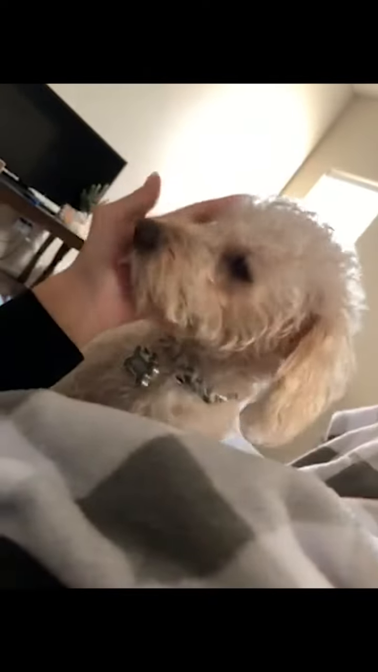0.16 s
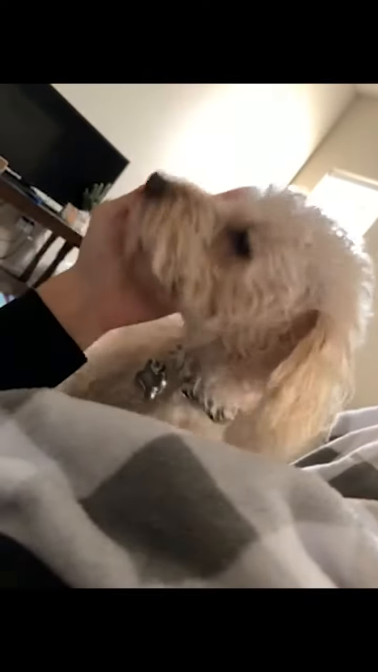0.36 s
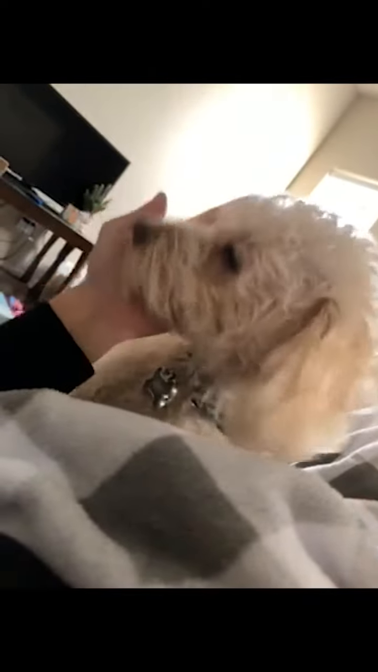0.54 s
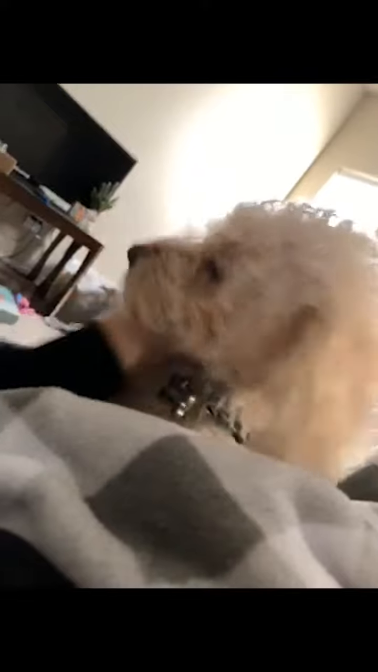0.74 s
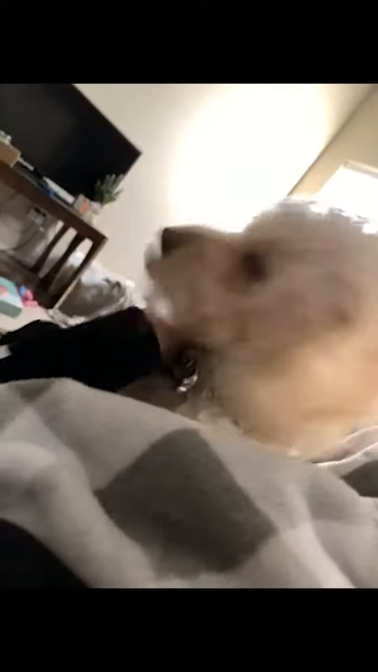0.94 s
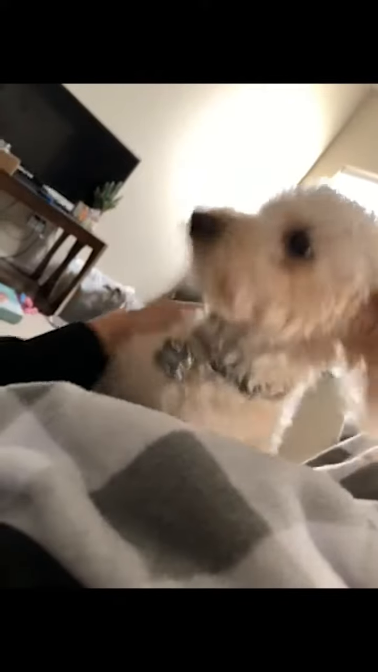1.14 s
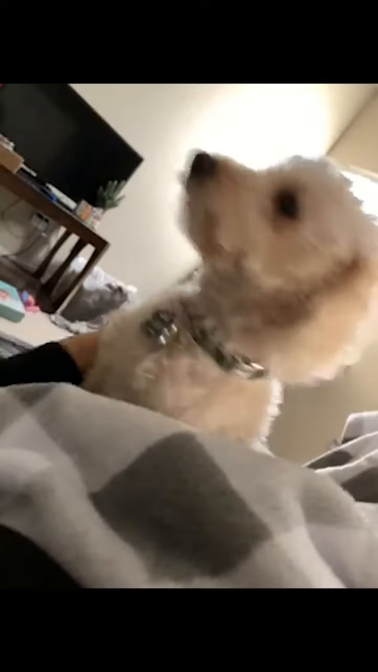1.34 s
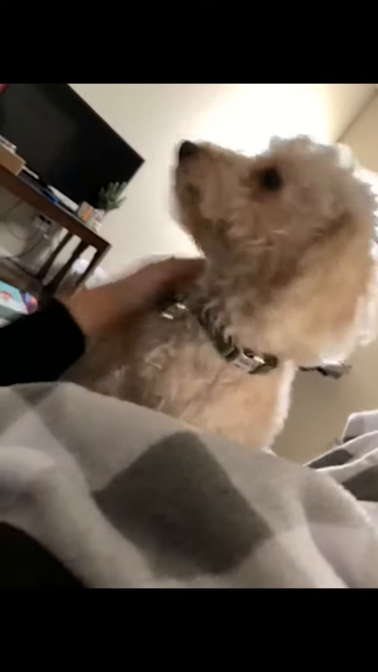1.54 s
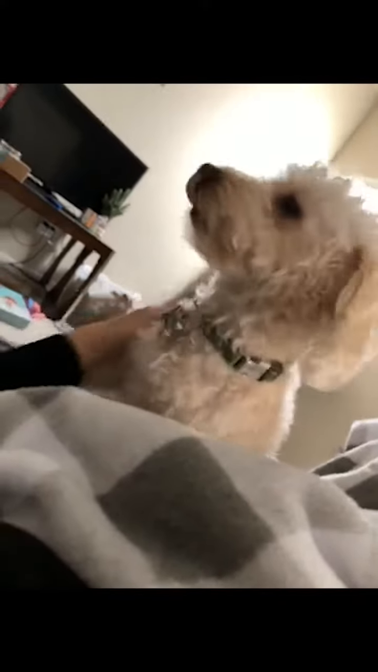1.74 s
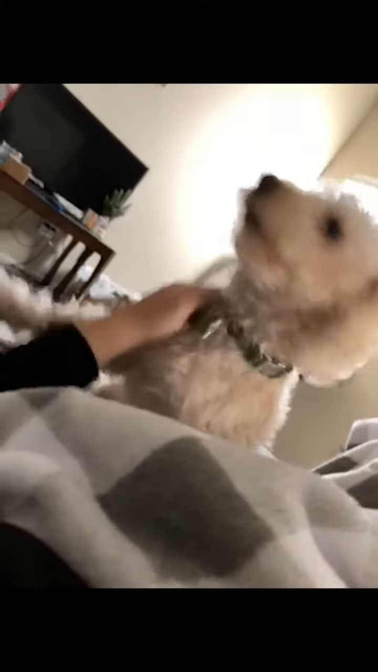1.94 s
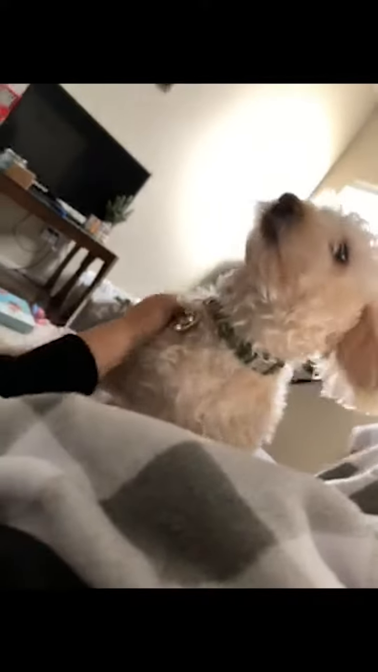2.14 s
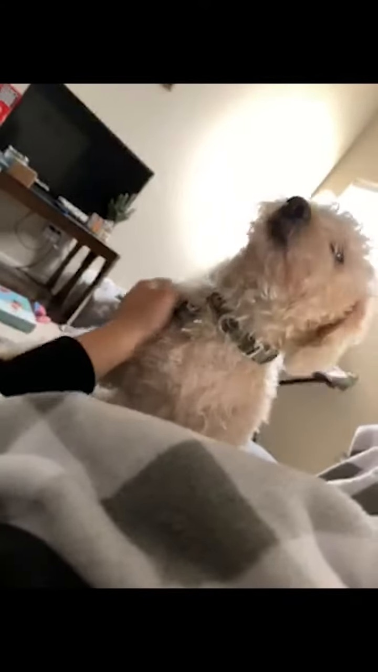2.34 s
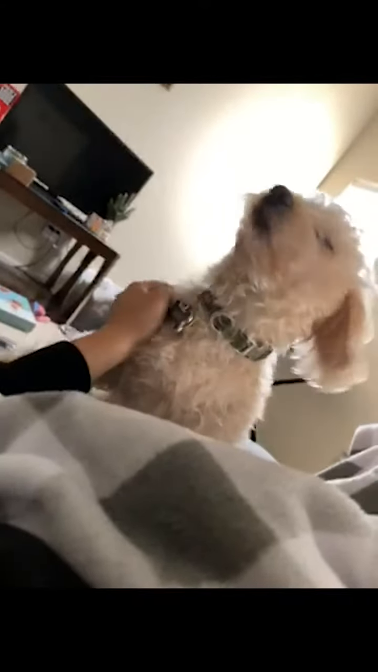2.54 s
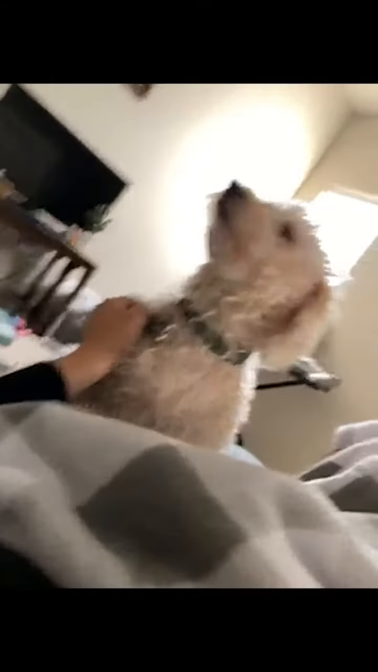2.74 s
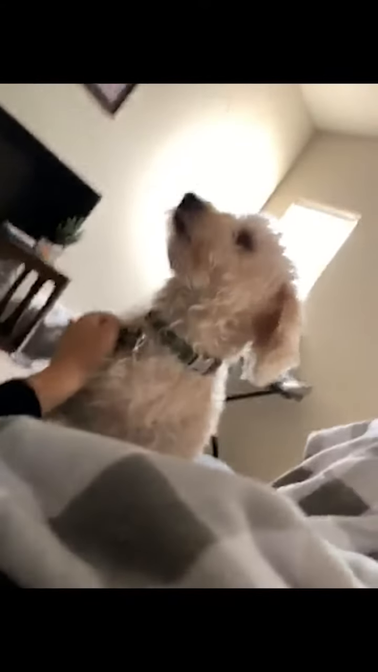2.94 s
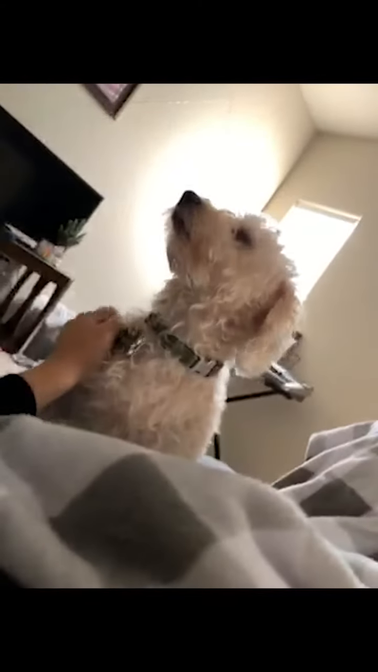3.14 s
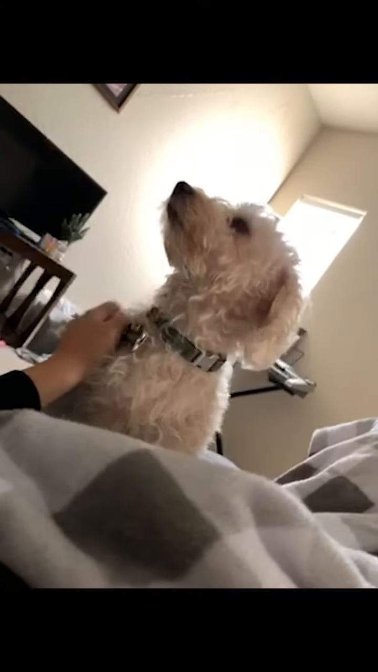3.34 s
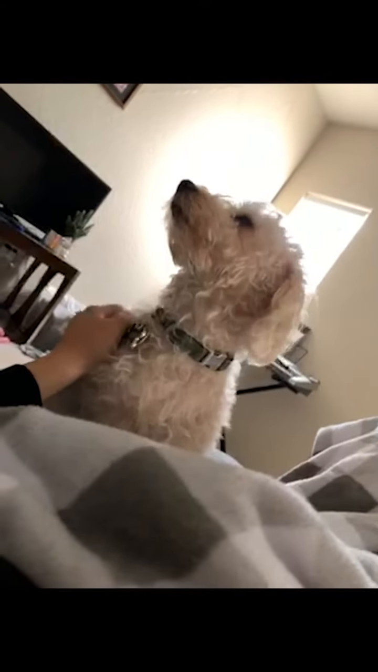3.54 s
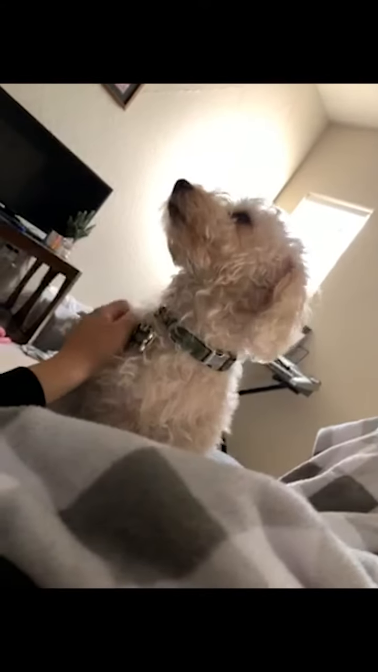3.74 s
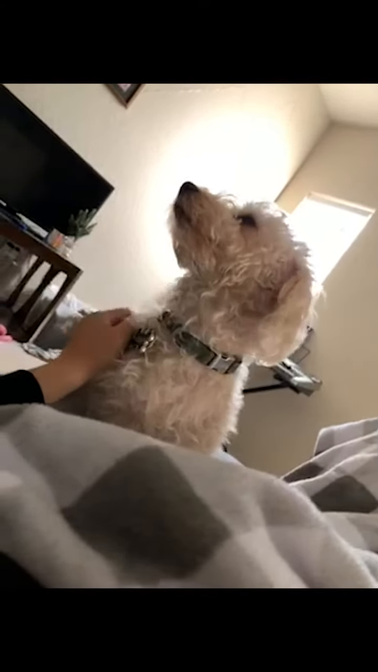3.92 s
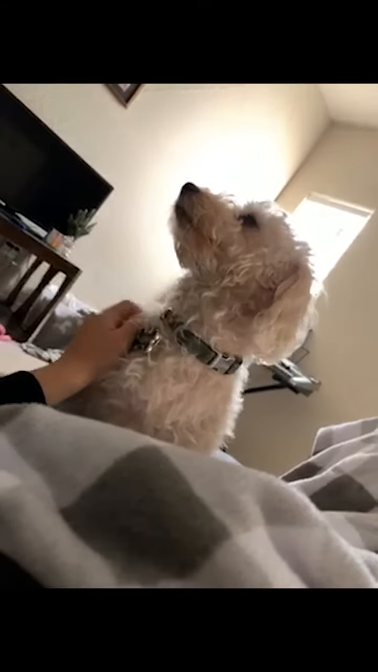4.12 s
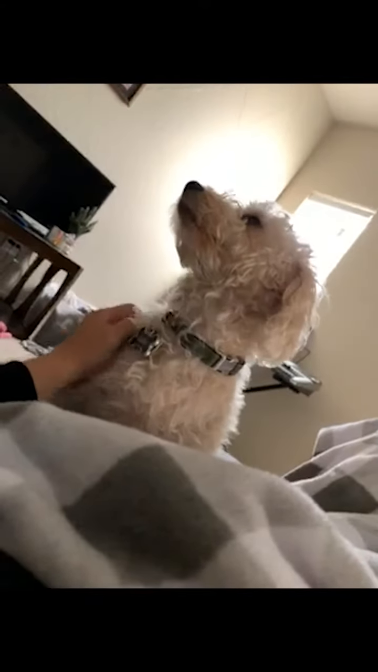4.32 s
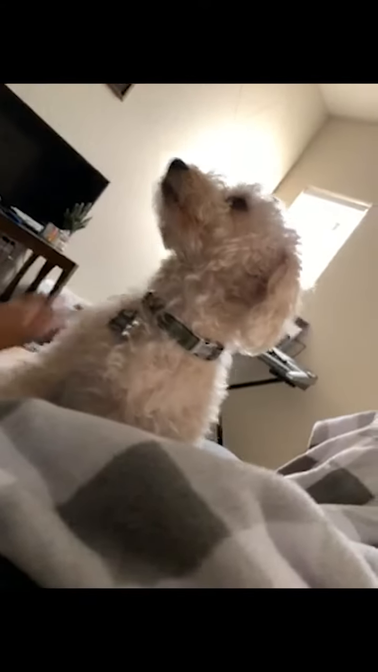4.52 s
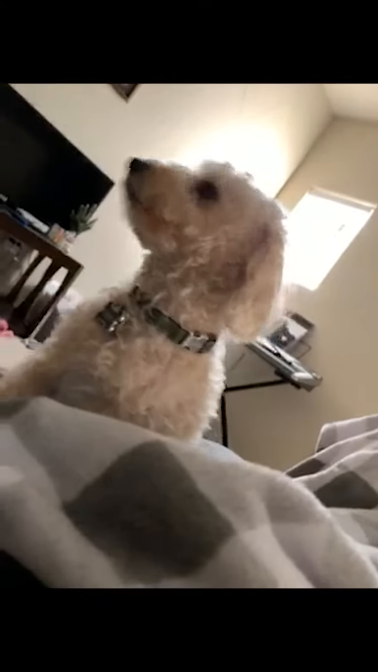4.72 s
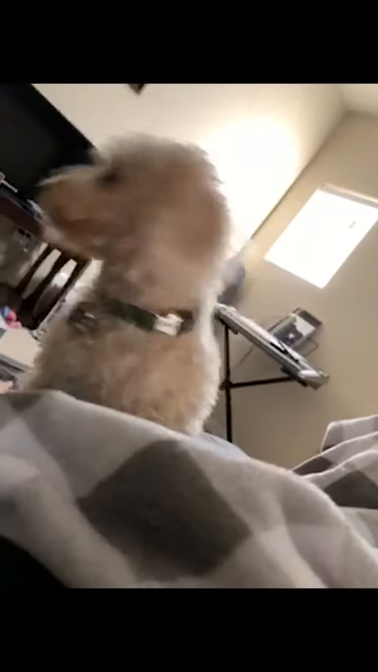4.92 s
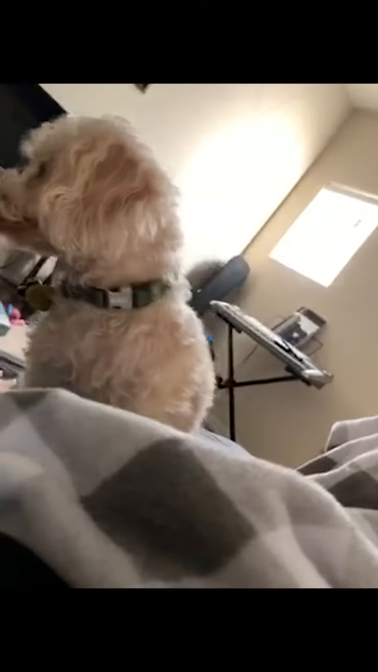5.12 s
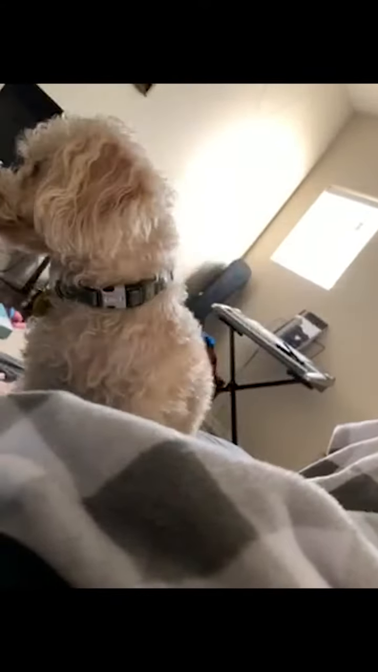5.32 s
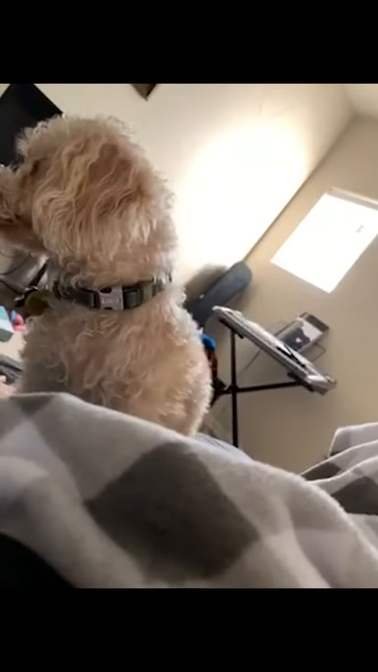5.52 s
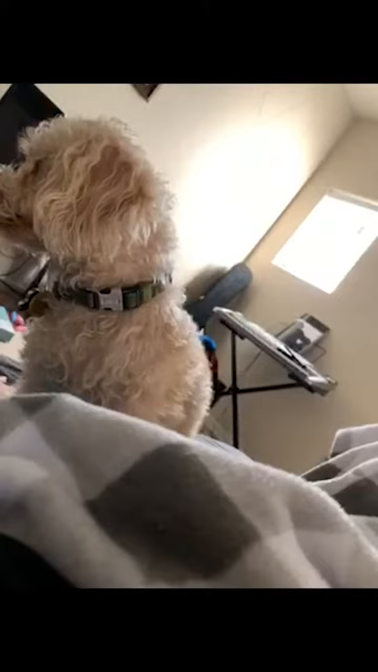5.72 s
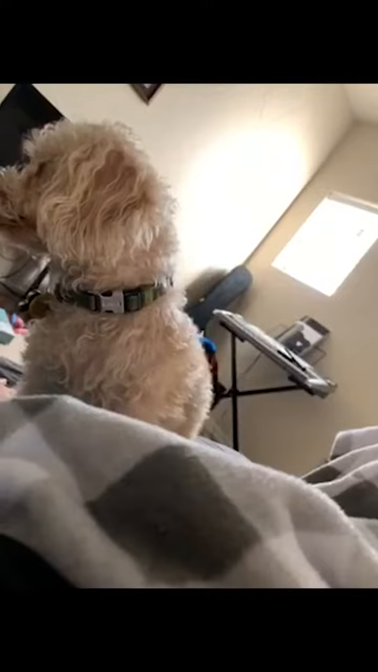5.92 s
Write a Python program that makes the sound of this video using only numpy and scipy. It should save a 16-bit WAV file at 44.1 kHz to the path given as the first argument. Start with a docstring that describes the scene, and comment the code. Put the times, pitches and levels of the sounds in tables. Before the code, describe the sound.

Close, dry jingling of collar tags and grainy fur scratching on a creaky bed, with a single dull thump near the end.

```python
"""On a bed, close to a hand-held camera: fingers scratch a small dog's curly neck, as swelling bands of grainy noise.
The collar tags, damped by fur, clack without ringing on: short noisy contacts excite heavily damped resonances.
The bed frame creaks in low slips, knocks falling in pitch; the mattress rumbles and the bedding rustles as shaped
noise. One heavy thump is a set of late, decaying modes over a slap. Cloth scuffs and a steady hiss lie around them."""
import sys
import numpy as np
from scipy import signal
from scipy.fft import rfft, irfft
from scipy.io import wavfile
from scipy.ndimage import uniform_filter1d

SR = 44100
rng = np.random.default_rng(int(sys.argv[2]) if len(sys.argv) > 2 else 0)


def gain_from_decibels(decibels):
    """Convert decibel values to linear amplitude factors."""
    exponent = np.asarray(decibels, float) / 20
    return 10 ** exponent


def wav_record(signal):
    """Record a signal, one row per channel, as 16-bit PCM in the file named by sys.argv[1]."""
    frames = np.transpose(np.atleast_2d(signal))
    bounded = np.clip(frames, -1, 1)
    # unit amplitude maps onto the largest positive 16-bit level
    quanta = np.round(bounded * 32767).astype(np.int16)
    wavfile.write(sys.argv[1], SR, quanta)


N = 263316

# slips of the bed frame, each of which also drags the bedding: (time [s], level [dB], knock pitch [Hz])
SLIPS = [(0.06, -28.5, 341), (0.16, -29.5, 365), (0.404, -22.5, 297), (0.492, -23, 290), (0.511, -26, 250),
         (0.547, -30, 290), (0.559, -21, 322), (0.596, -17, 284), (0.616, -22, 212), (0.634, -27, 250),
         (0.97, -27, 250), (1.101, -24, 345), (1.298, -21, 333), (1.346, -21, 312), (1.403, -18.5, 316),
         (1.465, -23.5, 380), (1.515, -28, 234), (1.523, -26, 340), (1.545, -21, 315), (1.575, -30.5, 360),
         (2.124, -22, 209), (2.145, -24.5, 210), (2.196, -24.5, 334), (2.211, -29, 240), (2.267, -35, 224),
         (2.296, -35, 274), (2.573, -24.5, 316), (2.734, -26, 238), (4.536, -18.5, 335), (4.566, -19, 323),
         (4.589, -21.5, 320), (4.622, -20, 310), (4.654, -22, 350), (5.054, -23.5, 213.5),
         (5.094, -22, 255), (5.115, -16.5, 290), (5.141, -28, 275), (5.16, -26.5, 234), (5.201, -31, 250)]


def evened(x):
    """Scales to rms 1."""
    return x / np.sqrt(np.mean(x ** 2) + 1e-20)


def add(mix, s, sound):
    """Mixes a sound in at a time in seconds."""
    part = mix[round(s * SR):][:len(sound)]
    part += sound[:len(part)]


def resonate(x, hz, width):
    """A fixed or gliding resonance of gain 1: one complex pole, or shift down, smooth and shift back."""
    r = np.exp(-np.pi * max(width, 1) / SR)
    if np.ndim(hz) == 0:
        return 2 * signal.lfilter([1 - r], [1, -r * np.exp(2j * np.pi * hz / SR)], x).real
    turn = np.exp(2j * np.pi * np.cumsum(hz) / SR)
    return 2 * (turn * signal.lfilter([1 - r], [1, -r], x / turn)).real


def through(x, modes):
    """Steep-sided resonances side by side, each two poles deep, with alternating sign."""
    total = 0
    for k, (hz, width, db) in enumerate(modes):
        band = resonate(resonate(x, hz, width), hz, width)
        total = total + (-1) ** k * gain_from_decibels(db) * band
    return total


def level_curve(rows):
    """Table levels in dB joined by straight lines in time."""
    s, db = np.transpose(rows)
    return np.interp(np.arange(N) / SR, s, db)


def lumpy(per_s, depth_db):
    """Noise whose level wanders at about per_s times a second, by depth_db rms."""
    span = int(SR / per_s)
    wander = evened(uniform_filter1d(uniform_filter1d(rng.standard_normal(N), span), span))
    return rng.standard_normal(N) * gain_from_decibels(depth_db * wander)


def snaps(per_s, spread_db, low_hz, high_hz, count):
    """Sparse tiny ticks of random size, each with one of count short rings."""
    happens = rng.random(N) < per_s / SR
    size = gain_from_decibels(spread_db * np.minimum(rng.exponential(1, N), 4)) * happens
    kind, t = rng.integers(0, count, N), np.arange(200) / SR
    ticks = np.zeros(N)
    for k, hz in enumerate(np.geomspace(low_hz, high_hz, count)):
        ring = np.sin(2 * np.pi * hz * t) * np.exp(-t * hz / 3.4)
        ticks += signal.oaconvolve(size * (kind == k), ring)[:N]
    return evened(ticks)


def fur():
    """Hairs slide and snap past the nails: grainy noise in three broad bands, each swelling on its own."""
    # finger strokes through fur: (peak time [s], scratch level [dB], time to swell 20 dB [s],
    # time to fade 20 dB [s], dull swish re scratch [dB], fine hiss re scratch [dB])
    strokes = [(0.031, -42.5, .5, 0.05, 2, -4), (.367, -57, 0.7, .15, -3, 0),
               (.678, -51.5, 0, 0.06, -11, -10), (.854, -55, 0.2, 0.3, -5, -0.5),
               (1.0, -47, 0.07, .25, -3, -8), (1.11, -47, 0.27, 0.33, -7.5, -9),
               (1.35, -50, .9, .11, -6.5, -5), (1.56, -41.5, .12, 0.1047, 1, -8.5),
               (1.724, -30.5, .08, .13, -11.5, -4), (1.82, -44.5, .3, .15, -12, -13),
               (1.966, -40, .15, .11, -5, -9), (2.065, -42.5, 0.12, 0.28, -8, -5),
               (2.167, -46.5, .5, 0.08, -9.5, -5), (2.45, -50, 0.1, .15, -6.5, -4),
               (2.54, -60, 0.7, .2, -9, 4), (2.656, -58, 0.8, 0.4, -8.5, -1),
               (2.774, -53, .15, 0.32, -3.5, -2), (2.87, -57, .3, 0.23, 2, -1.5),
               (3.211, -52.5, .125, 0.3, -6, -4), (3.608, -48, .13, .14, -8, -6),
               (3.911, -53, .04, .3, -7, -2), (3.95, -48.5, .13, .1, -7, -3),
               (4.186, -62, 0.2, 0.4, -6, 2.5), (4.335, -54, .13, .12, -3.5, -1),
               (4.45, -54, .25, .09, -5, -1), (4.63, -61, .15, .15, 3, -2)]
    # resonances of the scratch, the dull swish and the fine hiss: (centre [Hz], pole width [Hz], relative level [dB])
    scratch_modes = [(6110, 2300, 2), (7630, 1900, 0.5)]
    swish_modes = [(1710, 2440, 2), (3670, 2970, 3), (4630, 1230, -4)]
    hiss_modes = [(10270, 3100, 3.5), (12730, 2800, 0.5), (15100, 2390, -0.5)]
    roundness = 1.35  # 1 = pointed stroke peak, 2 = round

    t = np.arange(N) / SR
    coarse_t = t[::44]  # about every millisecond
    s, db, swell_s, fade_s, swish_db, hiss_db = np.transpose(strokes)[:, :, None]
    away = np.maximum((s - coarse_t) / swell_s, (coarse_t - s) / fade_s)
    strokes_db = db - 20 * away ** roundness

    def pressure(rel_db):
        """The strongest stroke of each moment sets the gain."""
        return gain_from_decibels(np.interp(t, coarse_t, (strokes_db + rel_db).max(0)))

    hairs = lumpy(per_s=140, depth_db=1.5)
    scratch = evened(through(hairs, scratch_modes)) + 0.4 * snaps(260, 4., 4800, 8700, count=8)
    swish = evened(through(hairs, swish_modes)) + 0.28 * snaps(200, 3.5, 1800, 4500, count=8)
    # light hairs move little air at low pitch
    swish = signal.sosfilt(signal.butter(3, 1350, "high", fs=SR, output="sos"), swish)
    fine = evened(through(hairs, hiss_modes))
    parts = pressure(0) * scratch, pressure(swish_db) * swish, pressure(hiss_db) * fine

    out = np.zeros(N)
    for part, points in zip(parts, rng.standard_normal((3, 400))):
        swell = evened(np.interp(t, np.arange(len(points)) / 35, points))  # 35 random points a second
        out += gain_from_decibels(1.6 * swell) * part
    return out


def tags():
    """Each clack is a sharp contact with a short chatter, exciting a heavily damped ring."""
    # tag clacks: (time [s], ring level [dB], ring pitch [Hz], dull body re ring [dB], bright edge re ring [dB])
    clacks = [(0.017, -19, 4500, -16, -11), (0.108, -33, 6740, -16, -20), (0.143, -43, 4370, 14.5, -3),
              (0.1872, -34.5, 7000, -20, -1), (0.6571, -48.5, 4470, 12, -11), (0.6597, -38, 7750, -7, -8),
              (0.6771, -23.5, 6900, -32, -2), (0.739, -39, 6500, -17, -3), (0.8637, -30.5, 8060, -19, -9),
              (0.8729, -37, 7840, -12, -3), (1.028, -16, 6830, -13.5, -10), (1.0983, -17, 6560, -16, -28),
              (1.1004, -19, 6340, -8.5, -25), (1.112, -17.5, 6980, -23, -30),
              (1.1154, -14.5, 6600, -16, -32), (1.6493, -33, 8480, -17, 13), (1.6585, 6.5, 7060, -15, -10),
              (1.6803, -25, 7240, -10, -16), (1.7096, 8.5, 6940, -11.5, -6), (1.7111, 2, 7000, -14, -8),
              (1.7137, -5.5, 7160, -26, -30), (1.715, -3.5, 7260, -23, -30), (1.721, -0.5, 6500, -23, -4),
              (1.7247, -12.5, 6240, -3.5, -1), (1.7491, -14.5, 7210, -8.5, -3),
              (1.7862, -20, 6240, -10, -15), (1.802, -1, 6650, -20, -13.5), (1.8085, -22, 6700, -9, -1),
              (1.932, -25, 7200, -14, -16), (1.9469, -21, 6500, -10, -30), (1.9664, -5.5, 6850, -33, -16),
              (1.9674, -9, 6830, -29, -12), (1.971, -24, 7360, -10, 5), (1.9746, -7.5, 6540, -25, -18),
              (2.004, -23, 5300, -19, -11), (2.007, -22, 6960, -16.5, -10), (2.0485, -14, 7600, -10.5, 10),
              (2.0564, -9, 6600, -12.5, -15), (2.0626, -9, 6270, -29, -5.5), (2.082, -24, 6500, -26, 0),
              (2.1084, -8, 6800, -15.5, -33), (2.1416, -14.5, 6760, -18, -9), (2.3542, -27, 6300, -29, -24),
              (2.3811, -25, 5500, -27, -28), (2.8748, -39.5, 6000, 0.5, 6)]
    # body, edge and a neighbouring mode rung by every clack: (centre [Hz], pole width [Hz], relative level [dB])
    body_modes = [(2490, 850, -4.5), (3810, 2080, -3)]
    edge_modes = [(8800, 2640, -4.5), (12530, 1600, -4), (14630, 1400, -1.5)]
    upper_modes = [(7130, 970, -8)]
    chatter_s, chatter_spread_db = 0.0008, 2  # how long a contact rattles, and how much that varies

    out, t = np.zeros(N), np.arange(600) / SR
    chance = rng.standard_normal((len(clacks), len(t) + 1))
    for (s, db, hz, body_db, edge_db), (luck, *noise) in zip(clacks, chance):
        rattle_s = chatter_s * gain_from_decibels(chatter_spread_db * luck)
        contact = 0.73 * np.array(noise) * np.exp(-t / rattle_s)
        contact[:2] += 1.5  # the sharp first touch
        ring = resonate(resonate(contact, hz, 790), hz, 3200) + through(contact, upper_modes)
        parts = ring, through(contact, body_modes), through(contact, edge_modes)
        ring, body, edge = (p / abs(p).max() for p in parts)
        add(out, s - 0.0003, gain_from_decibels(db) * (ring + gain_from_decibels(body_db) * body + gain_from_decibels(edge_db) * edge))
    # small tags move little air below 900 Hz
    return signal.sosfilt(signal.butter(2, 900, "high", fs=SR, output="sos"), out)


def scuffs():
    """Brief rubs of cloth and collar: noise in a sinking resonance, quick to start and slow to fade."""
    # (time [s], length [s], level [dB], start pitch [Hz], pole width [Hz])
    rubs = [(0, 0.099, -41.5, 1080, 1000), (0.144, 0.028, -48.5, 2830, 900),
            (0.138, 0.042, -42.5, 1150, 600), (0.218, 0.12, -47.5, 835, 393),
            (1.535, 0.115, -42.5, 3200, 1500), (1.713, 0.075, -37, 4200, 993),
            (1.786, 0.0099, -33, 3000, 610), (1.995, 0.0069, -36, 2220, 400),
            (2.005, 0.006, -38, 2220, 400), (2.1, 0.18, -45.5, 650, 480), (2.139, 0.062, -43, 9200, 1200),
            (2.205, .06, -54, 4090, 200), (4.709, 0.02, -31.5, 600, 700), (4.59, .11, -51, 1500, 900),
            (4.873, 0.03, -49, 2100, 1300), (4.89, .08, -50, 1500, 800)]
    out, chance = np.zeros(N), rng.standard_normal((len(rubs), SR // 4))
    for (s, length, db, start_hz, width), noise in zip(rubs, chance):
        u = np.arange(round(length * SR)) / (length * SR)  # 0 to 1 along the rub
        hz = start_hz - 0.62 * width * u
        rub = resonate(resonate(noise[:len(u)], hz, width), hz, width)
        add(out, s, gain_from_decibels(db) * evened(rub) * np.sin(np.pi * u ** 0.51))
    return out


def frame():
    """A joint slips: a tick, a knock that falls quickly in pitch, then the frame rings on briefly."""
    # after-ring of the frame: (pitch [Hz], level re slip [dB], time to fall 60 dB [s])
    after_modes = [(147, 2, 0.062), (250, -9, 0.085), (518, -12, 0.037)]
    out, t = np.zeros(N), np.arange(5000) / SR
    tick = gain_from_decibels(-21 - 60 * t / 0.011) * np.sin(2 * np.pi * 1200 * t)  # the joint lets go
    rise = 1 - np.exp(-(t / 0.0075) ** 2)
    for (s, db, hz), phases in zip(SLIPS, rng.random((len(SLIPS), len(after_modes)))):
        turns = np.cumsum(hz * (1 + 4.1 * np.exp(-t / 0.001285))) / SR
        knock = np.sin(2 * np.pi * turns) * (t / 0.0052 * np.exp(1 - t / 0.0047)) ** 3
        after = np.zeros(len(t))
        for (f, f_db, t60), phase in zip(after_modes, phases):
            after += gain_from_decibels(f_db - 60 * t / t60) * np.sin(2 * np.pi * (f * t + phase))
        add(out, s - 0.002, gain_from_decibels(db) * (tick + knock + rise * after))
    return out


def thump():
    """One heavy blow: the modes swell one after another over a dying slap of noise."""
    # modes of the struck bed, slow bending waves arriving late:
    # (pitch [Hz], level [dB], time to fall 60 dB [s], rise [s], delay [s])
    blow_modes = [(68.3, 12.5, 0.097, 0.016, 0.017), (60.7, -10, 0.45, .02, 0.014),
                  (155.9, 5, 0.092, .005, 0.0057), (253.3, 6.5, 0.062, 0.0019, 0.0012),
                  (337.3, -4, 0.11, 0.0021, 0.0011), (552.6, -4.5, 0.073, 0.0018, 0.0012),
                  (700, -13.5, 0.085, .001, 0.0011), (1042, -17.5, 0.034, .001, 0.00096)]
    # bands of the slap, each as wide as its centre: (centre [Hz], level [dB], time to fall 60 dB [s])
    slap_bands = [(131.2, -12, 0.354), (350, -20.5, 0.45), (900, -22.5, 0.24), (1600, -26, 0.23),
                  (2530, -31, .11), (5500, -44, .08)]
    thump_s = 4.7315
    out, t = np.zeros(N), np.arange(SR // 2) / SR
    for hz, db, t60, rise, delay in blow_modes:
        swell = gain_from_decibels(db - 60 * t / t60) * (1 - np.exp(-t / rise))
        add(out, thump_s + delay, swell * np.sin(2 * np.pi * hz * t))
    noise, slap = rng.standard_normal(len(t)), np.zeros(len(t))
    for hz, db, t60 in slap_bands:
        band = resonate(through(noise, [(hz, hz, 0)]), hz, hz)
        slap += gain_from_decibels(db - 60 * t / t60) * evened(band)
    add(out, thump_s - 0.004, slap * (1 - np.exp(-t / 0.0012)))
    return out


def bed():
    """Mattress rumble and lumpy rustle of the bedding, which flares up around every slip of the frame."""
    # weight shifting on the mattress: (time [s], rumble level [dB])
    rumble_rows = [(0.0, -36), (0.08, -32.5), (0.75, -35), (0.82, -31), (1.18, -31.5), (1.5, -34),
                   (2.0, -35.5), (2.3, -33.5), (2.98, -36), (3.04, -48), (3.1, -48), (3.17, -33.5),
                   (3.34, -31.5), (3.42, -47.5), (3.61, -34), (3.7, -38), (3.92, -31), (4.1, -36.5),
                   (4.16, -42.5), (4.55, -30), (4.78, -28), (4.912, -22), (5.352, -39), (5.97, -42.5)]
    # bedding moving between the slips: (time [s], rustle level [dB])
    rustle_rows = [(0.0, -46), (0.39, -46.5), (0.67, -46.5), (0.8, -41.5), (1.12, -38.5), (1.26, -49.5),
                   (1.6, -45), (1.9, -49.5), (2.08, -45), (2.15, -39.5), (2.55, -50), (2.8, -46),
                   (3.1, -51.5), (3.7, -48), (4.5, -48), (4.88, -32), (5.0, -51), (5.1, -44), (5.28, -50.5),
                   (5.97, -54.5)]
    # resonances of mattress and bedding: (centre [Hz], pole width [Hz], relative level [dB])
    rumble_modes = [(64.9, 26.7, 3), (109.3, 56, -9.5)]
    rustle_modes = [(147, 118.5, 5.5), (301, 291, -3), (607, 670, -13)]
    drag_db, rise_s, t60_s, lead_s = -17.5, 0.015, 0.22, 0.015  # drag re slip level; it starts ahead of the slip

    drag, t = gain_from_decibels(level_curve(rustle_rows)), np.arange(SR // 2) / SR
    for s, db, _ in SLIPS:
        add(drag, s - lead_s, gain_from_decibels(db + drag_db - 60 * t / t60_s) * (1 - np.exp(-t / rise_s)))
    rumble = evened(through(rng.standard_normal(N), rumble_modes))
    rustle = evened(through(lumpy(per_s=51, depth_db=3.5), rustle_modes))
    return gain_from_decibels(level_curve(rumble_rows)) * rumble + drag * rustle


def hiss():
    """Steady noise of room and microphone, coloured by a spectrum joined over log frequency."""
    # (frequency [Hz], relative spectrum level [dB])
    spectrum_rows = [(18, -58), (30, -28), (59, -1), (79, 20.5), (183, -33.5), (335, -30), (509, -32.5),
                     (755, -35.5), (907, -35.5), (1030, -37), (15800, -47)]
    hz, (f, db) = np.fft.rfftfreq(N, 1 / SR), np.transpose(spectrum_rows)
    colour = gain_from_decibels(np.interp(np.log(hz + 1), np.log(f + 1), db)) * (hz > 120)
    shaped = rfft(rng.standard_normal(N)) * colour
    above_300 = irfft(shaped * (hz > 300), N)
    return gain_from_decibels(-54.5) * irfft(shaped, N) / np.std(above_300)  # the level is the rms above 300 Hz


def scene():
    """All sources at one microphone."""
    return (tags() + fur() + scuffs() + frame() + bed() + thump() + hiss())[None]


def low_pass(x):
    """Removes everything above the highest recorded frequency."""
    return signal.sosfilt(signal.butter(12, 15950, fs=SR, output="sos"), x)


def record(dry):
    """The loudest peaks overload the input and are clipped flat."""
    mix = np.clip(dry, -1, 1)
    return low_pass(mix)


dry = scene()
out = record(dry)
wav_record(out)
```